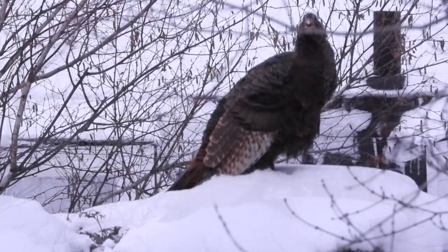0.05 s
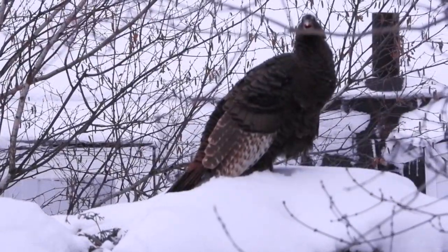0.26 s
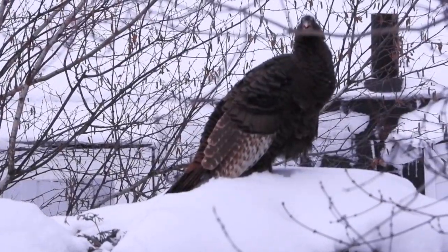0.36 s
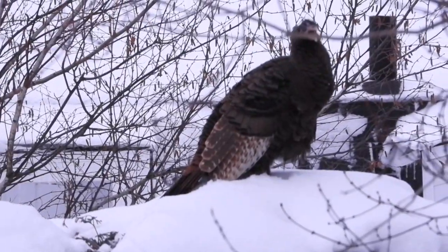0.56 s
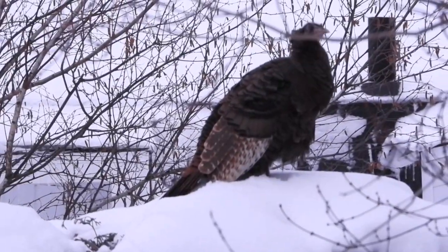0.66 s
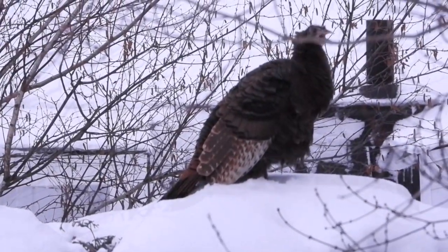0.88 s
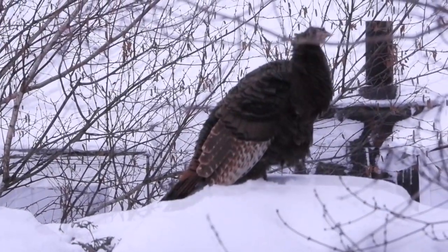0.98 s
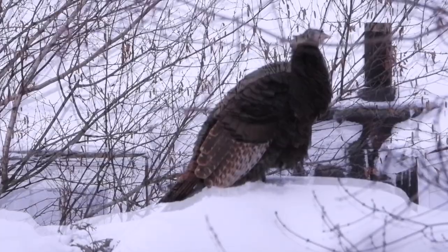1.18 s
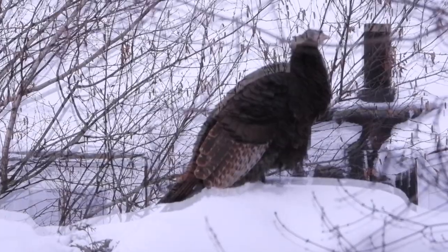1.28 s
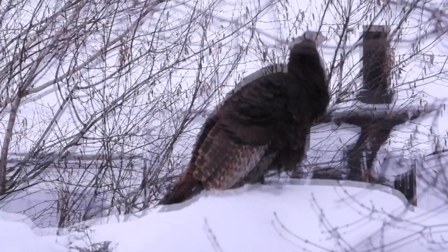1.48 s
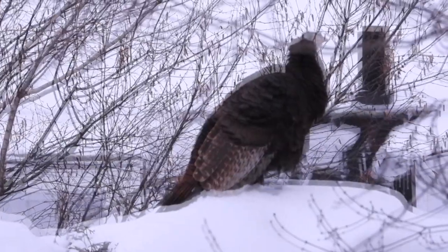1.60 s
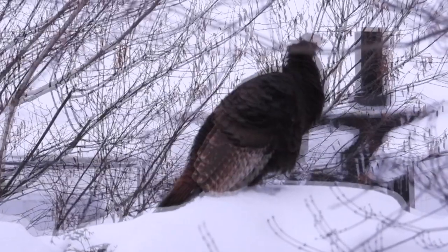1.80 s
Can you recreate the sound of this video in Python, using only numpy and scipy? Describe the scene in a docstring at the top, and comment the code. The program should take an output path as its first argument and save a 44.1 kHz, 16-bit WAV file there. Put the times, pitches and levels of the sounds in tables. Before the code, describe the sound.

A wild turkey yelps five times, growing louder and raspier over faint outdoor rumble.

```python
"""Wild turkey in a snowy yard

A turkey yelps five times, growing louder. Its syrinx is the source, its throat and beak the filter.
The first yelps are thin whistles with a burr of period doubling; the last two break downward into
a harsh rasp. Walls return short echoes and bushes scatter the call over a faint, distant rumble."""
import sys
import numpy as np
from scipy import signal
from scipy.fft import rfft, irfft
from scipy.io import wavfile
from scipy.ndimage import uniform_filter1d

SR = 44100
rng = np.random.default_rng(int(sys.argv[2]) if len(sys.argv) > 2 else 0)


def file_out(sig):
    """Save sig as 16-bit WAV at sys.argv[1]."""
    # one column per channel
    cols = np.atleast_2d(sig).T
    # limit, then scale
    lim = np.clip(cols, -1, 1)
    pcm = np.round(lim * 32767).astype(np.int16)
    wavfile.write(sys.argv[1], SR, pcm)


N = 81585
LEAD_IN = SR // 10   # the first yelp is already under way at time zero
TIME = np.arange(-LEAD_IN, N) / SR
LENGTH = len(TIME)


def syrinx(curve):
    """Period doubling: a nonlinear oscillator adds half and quarter orders to its harmonic series."""
    # subharmonic gains: t/s, order 1.5/dB, odd quarter orders/dB
    doubling = [(.26, -23, -23.5), (.46, -2, -16.5), (.53, -13.5, -23.5), (.7, -3, -11), (.77, 3.5, -13),
                (1.0, 2, -23)]
    jitter_depth, jitter_hz = .033, 160   # of the pitch; depths hold at full roughness
    flutter_depth, flutter_hz = .92, 110   # of each partial
    stutter_db, stutter_hz = 8, 140   # of the whole voice
    overtone_flutter, quarter_flutter = .25, .27   # independent of roughness
    hiss_db, undertone_db = -17, 7.5
    treble_ramp_hz, top_ramp_hz = (2800, 3710), (4337, 6000)
    attack_s, release_s = .0018, .0053
    pitch, level_db, second_db, treble_db, top_db, subharmonic_db, rough = in_time(curve)
    low_half_db, quarter_db = in_time(doubling)
    before, after = np.minimum(TIME - curve[0][0], 0), np.maximum(TIME - curve[-1][0], 0)
    gate = np.exp(-(before / attack_s) ** 2 - after / release_s)
    phase = 2 * np.pi * np.cumsum(pitch * (1 + jitter_depth * rough * drift(jitter_hz))) / SR
    voice = from_db(hiss_db) * rough * rng.standard_normal(LENGTH) * (1 + np.cos(phase))   # pulsed air
    for order in np.arange(2, 33) / 4:
        hz = order * pitch
        db = treble_db * np.interp(hz, treble_ramp_hz, (0, 1)) + second_db * (order == 2)
        db += top_db * np.interp(hz, top_ramp_hz, (0, 1))
        flutter = flutter_depth * rough + overtone_flutter * np.clip(order - 1, 0, 1)
        if order % 1:   # between the harmonics
            db += subharmonic_db + low_half_db * (order == 1.5)
        if order % .5:   # odd quarter orders
            db += quarter_db
            flutter = quarter_flutter
        if order < 1:   # undertones vanish in a clean yelp
            db += undertone_db + 40 * np.log10(np.clip(2 * rough, .01, 1))
        angle = order * phase + rng.uniform(0, 2 * np.pi)
        in_phase = (1 + flutter * drift(flutter_hz)) * np.sin(angle)
        quadrature = flutter * drift(flutter_hz) * np.cos(angle)
        voice += from_db(db) * (in_phase + quadrature) / np.sqrt(1 + 2 * flutter ** 2)
    return gate * from_db(level_db + stutter_db * rough * np.tanh(drift(stutter_hz))) * voice


def yelps():
    """Self-sustained oscillation in two registers; in the fourth yelp the low one overlaps the high."""
    # one curve per voiced stretch: t/s, pitch f/Hz, source level/dB, second harmonic/dB,
    # treble/dB, top/dB, subharmonics/dB, roughness (0-1)
    curves = [
        [(-.05, 1441, -45, -10.5, 1.5, -27, -21, 0), (0, 1452, -33.5, -8, -7.5, 7.5, -16, .05),
         (.012, 1550, -33, -20, -18, -23, -27.5, .15), (.034, 1512, -66, -17, 1, 0, -23.5, .15)],
        [(.158, 1506, -55, 3, -4, -12, -21, .02), (.17, 1474, -36, 4, 9.5, -40.5, -9.5, .06),
         (.198, 1513, -36.5, -0.5, 3.5, -10, -3, .05), (.23, 1436, -24.5, -30, -4.5, -19, -19.5, .04),
         (.25, 1456, -34.5, -12, 4, 3, -18.5, .09), (.265, 1456, -32, 15, -4, -8, -5.5, .1),
         (.276, 1547, -32.5, 5, -20.5, -8, -9.5, .2), (.284, 1662, -35.5, 2, -18, -16, -11.5, .15)],
        [(.429, 1590, -38.5, 16, -8, -35, -16, .1), (.436, 1508, -35.5, 2.5, 5.5, -27, -20, .12),
         (.458, 1500, -33, 8.5, 10.5, -22.5, -6, .03), (.477, 1479, -24.5, -4, -8, -20.5, -3.5, .1),
         (.5, 1432, -31.5, 7.5, 2, 0.5, -6, .02), (.52, 1454, -39.5, 17, 9, -5.5, 5.5, .03),
         (.528, 1512, -37.5, 14, 0.5, -3.5, -6.5, .06), (.538, 1626, -35, 9.5, -3.5, -13.5, -11.5, 0)],
        [(.675, 1579, -40, 9.5, 4.5, -6, -17.5, .3), (.682, 1526, -30.5, 4.5, 8, -14, -19.5, .1),
         (.7, 1528, -28.5, 14, -2, -9.5, 7.5, .08), (.724, 1512, -13.5, -1.5, -20, 9, -17.5, .04),
         (.737, 1505, -33, 5.5, -2, 4, -7.5, .2), (.757, 1515, -24, -1, -2.5, -8, -24.5, .3),
         (.778, 1639, -29, 13, -13, -13, -13.5, .25)],
        [(.742, 1257, -28.5, -8.5, -18, -8.5, -22, .1), (.747, 1180, -23.5, -1.5, -20, -6.5, -16.5, .12),
         (.757, 1112, -24, 11, -8, 3.5, -13, .05), (.768, 1115, -24.5, 6.5, -9, -5.5, -7, .2),
         (.78, 1264, -30.5, 6, -8.5, -14.5, -18, .35), (.802, 1245, -40.5, -3.5, -14.5, -11, -16.5, .35)],
        [(.987, 1470, -31, -11.5, -27.5, -14, -27, .11), (.993, 1466, -18, -15, -37.5, -19, -11.5, .09),
         (.999, 1128, -22, 9.5, 7.5, -33, -33.5, .06), (1.007, 1013, -20.5, 5, 5.5, -3, -7.5, .4),
         (1.018, 962.7, -25, 0, -11.5, 9, -3, 0.5), (1.031, 1029, -23, -4.5, -16.5, -0.5, -3.5, 0.7),
         (1.04, 997.3, -23, 0.5, -0.5, 7, -1.5, 0.42), (1.051, 972.5, -23.5, 2.5, -11.5, 6, 0, 0.6),
         (1.06, 1032, -36.5, 17, -27.5, -5.5, 1, .6), (1.071, 1054, -32.5, -1.5, -25.5, -8, 3, .6)],
    ]
    return sum(syrinx(curve) for curve in curves)


def squeaks():
    """Biphonation: a second, higher vibration of the syrinx beats against the three middle yelps."""
    # glides: start t/s, end t/s, first f/Hz, last f/Hz, first source level/dB, last source level/dB
    glides = [(0.154, 0.21, 1773, 1860, -52, -45.5), (0.417, 0.457, 1899, 1809, -46.5, -39.5),
              (0.665, 0.697, 1925, 1957, -35, -40)]
    # timbre: second harmonic/dB, treble/dB, top/dB, subharmonics/dB, roughness (0-1)
    timbre = (3, -1.5, -19, -29.5, .65)
    return sum(syrinx([(start, first_hz, first_db, *timbre), (end, last_hz, last_db, *timbre)])
               for start, end, first_hz, last_hz, first_db, last_db in glides)


def throat(source):
    """Source-filter principle: the resonances of throat and beak weight the spectrum of the voice."""
    # vocal tract response: f/Hz, gain/dB
    response = [(250, -68), (450, -45), (750, -10), (1000, -5.5), (1250, 0), (1500, 2), (1780, -4),
                (2050, 0), (2300, -4), (2620, -15.5), (2780, -18.5), (2950, -8.5), (3150, -8), (3600, -13),
                (3800, -14), (3990, -30.5), (4150, -14.5), (4300, -9), (4550, -8), (4800, -20),
                (5000, -12.5), (5500, -20), (5850, -18.5), (7000, -29), (7300, -39.5), (7700, -29.5),
                (8300, -65), (9500, -75)]
    hz = np.fft.rfftfreq(2 * LENGTH, 1 / SR)
    return irfft(rfft(source, 2 * LENGTH) * from_db(at_hz(response, hz)))[:LENGTH]


def direct_sound(call):
    """Directivity: the call shifts from right to left as the head turns."""
    # balance: t/s, left minus right level/dB
    beak_pan = [(0, -10), (.2, -4), (.47, -5.5), (.71, -4), (.77, -1.5), (1.0, 3), (1.06, 1.5)]
    pan_db, = in_time(beak_pan)
    return pan(pan_db) * call


def wall_echoes(call):
    """Reflection: walls return delayed, band-limited copies, most of them louder once the bird turns."""
    # paths: delay t/s, level/dB, lowest f/Hz, highest f/Hz, left minus right/dB, gain after the turn/dB
    paths = [(0.019, -12, 700, 7000, -12, 2.5), (0.033, -11, 700, 6000, 9, -1),
             (0.044, -20.5, 700, 5630, -8.5, 8.5), (0.066, -28.5, 700, 2800, 4, 5.5),
             (.102, -18, 750, 1592, -2, 9.5), (0.128, -31, 815, 1562, -14, 0.5),
             (.243, -41.5, 1853, 2118, 3.5, 13.5), (.17, -41, 1851, 2200, 4.5, 14.5)]
    turn_s = .81
    turned = TIME > turn_s
    echoes = 0
    for delay, db, low_hz, high_hz, pan_db, turn_db in paths:
        band = signal.butter(2, np.sort([low_hz, high_hz]), "band", fs=SR, output="sos")
        reflected = signal.sosfilt(band, call * from_db(db + turn_db * turned))
        echoes += pan(pan_db) * np.interp(TIME - delay, TIME, reflected, left=0)
    return echoes


def bush_scatter(call):
    """Diffuse scattering: bushes and snow add a tail that decays exponentially, the treble first."""
    # tail: f/Hz, level/dB, 60 dB decay time t/s, left-right correlation
    tail = [(700, -7, 0.4, 0.74), (1413, -12.5, 0.31, 0.54), (2100, -8.5, 0.38, 0.26), (3140, -14, 0.3, .1),
            (4460, 3, 0.14, .1), (7940, -3.5, 0.089, 0.091)]
    delay_s, build_s = .0042, .014
    age = np.maximum(TIME - TIME[0] - delay_s, 0)
    edges_hz = np.geomspace(450, 10000, 10)
    response = 0
    for low, high in zip(edges_hz, edges_hz[1:]):
        hz = np.sqrt(low * high)
        envelope = (1 - np.exp(-age / build_s)) * from_db(-60 * age / at_hz(tail, hz, column=2))
        noise = rng.standard_normal((2, LENGTH)) * envelope / np.sqrt(np.sum(envelope ** 2))
        mid, side = signal.sosfilt(signal.butter(2, [low, high], "band", fs=SR, output="sos"), noise)
        response += from_db(at_hz(tail, hz)) * widen(mid, side, at_hz(tail, hz, column=3))
    return signal.fftconvolve(call[None], response, axes=1)[:, :LENGTH]


def rumble():
    """Spectrally shaped noise: a faint, distant background that sinks after the last yelp."""
    # spectral density: f/Hz, relative level/dB
    spectrum = [(25, 3), (60, -8.5), (100, -23.5), (130, -12), (155, -5.5), (210, 0), (270, -5),
                (400, -3.5), (750, -4), (1100, -10.5), (2000, -14), (2800, -22.5), (4500, -20),
                (6500, -27.5), (8500, -42), (12500, -44.5)]
    # envelope: t/s, level/dB
    envelope = [(0, -55), (.6, -53.5), (1.0, -53), (1.28, -53.5), (1.5, -60.5), (1.7, -62.5), (1.85, -60.5)]
    # stereo coherence: f/Hz, left-right correlation
    coherence = [(60, 0.6), (200, .94), (1000, 0.45), (3000, 0.068), (8000, 0.057)]
    hz = np.fft.rfftfreq(LENGTH, 1 / SR)
    mid, side = rfft(rng.standard_normal((2, LENGTH))) * from_db(at_hz(spectrum, hz))
    level_db, = in_time(envelope)
    return from_db(level_db) * unit_rms(irfft(widen(mid, side, at_hz(coherence, hz)), LENGTH))


def from_db(db):
    """Amplitude ratio of a level in decibels."""
    return 10 ** (np.asarray(db) / 20)


def unit_rms(x):
    """Normalisation to unit mean power."""
    return x / np.sqrt(np.mean(x ** 2) + 1e-20)


def in_time(rows):
    """Linear interpolation of each column in time, with corners rounded over 4 ms."""
    times, *columns = np.transpose(rows)
    return [uniform_filter1d(np.interp(TIME, times, values), size=SR // 250) for values in columns]


def at_hz(rows, hz, column=1):
    """Interpolation of one column on a logarithmic frequency scale."""
    table = np.array(rows)
    return np.interp(np.log(np.maximum(hz, 1)), np.log(table[:, 0]), table[:, column])


def drift(rate_hz):
    """Low-pass filtered noise: smooth random motion of unit rms."""
    pole = np.exp(-2 * np.pi * rate_hz / SR)
    motion = signal.lfilter([1], [1, -2 * pole, pole * pole], rng.standard_normal(2 * LENGTH))
    return unit_rms(motion[LENGTH:])


def pan(db):
    """Left and right gains for an interchannel level difference."""
    return from_db(np.array([db / 2, -db / 2]).reshape(2, -1))


def widen(mid, side, correlation):
    """Sum and difference of two independent noises give a stereo pair of the given correlation."""
    common, opposed = np.sqrt(1 + correlation) * mid, np.sqrt(1 - correlation) * side
    return np.array([common + opposed, common - opposed]) / np.sqrt(2)


def scene():
    """Superposition of the direct call, its reflections and the background."""
    call = throat(yelps() + squeaks())
    return (direct_sound(call) + wall_echoes(call) + bush_scatter(call) + rumble())[:, LEAD_IN:]


def record(dry):
    """Band limiting: the microphone's wind filter cuts the deep bass, a steep low-pass the top."""
    wind_cut_hz, stopband_hz = 144, 13000
    dry = signal.sosfilt(signal.butter(4, wind_cut_hz, "high", fs=SR, output="sos"), dry)
    return signal.sosfilt(signal.cheby2(12, 70, stopband_hz, fs=SR, output="sos"), dry)


dry = scene()
out = record(dry)
file_out(out)
```